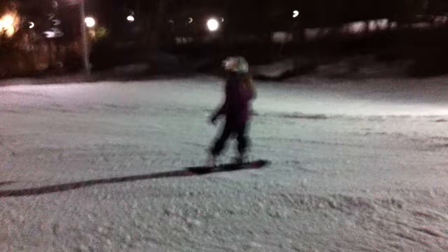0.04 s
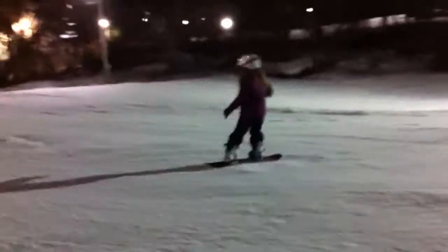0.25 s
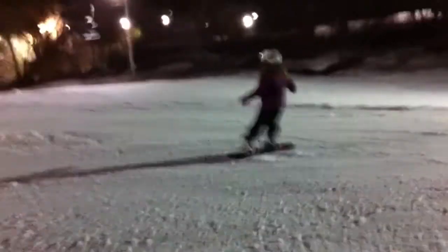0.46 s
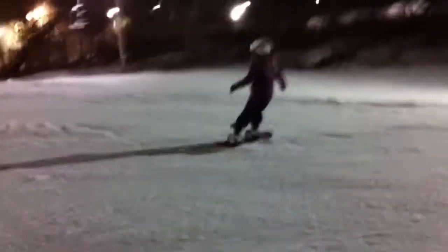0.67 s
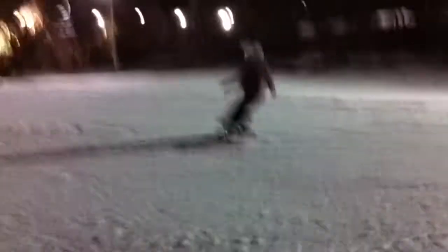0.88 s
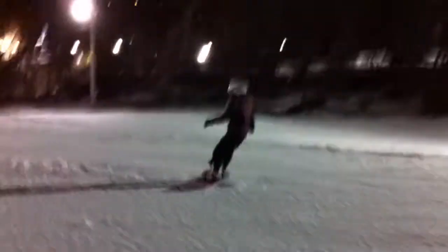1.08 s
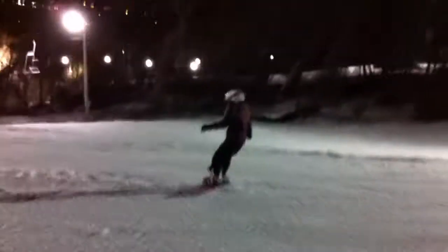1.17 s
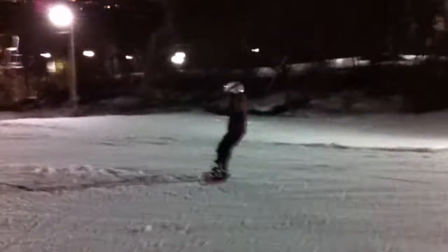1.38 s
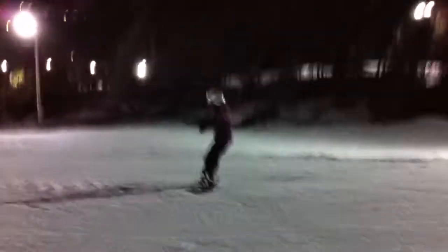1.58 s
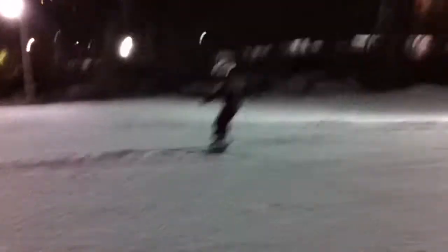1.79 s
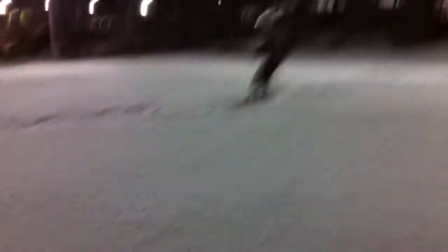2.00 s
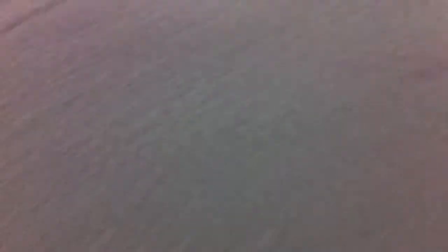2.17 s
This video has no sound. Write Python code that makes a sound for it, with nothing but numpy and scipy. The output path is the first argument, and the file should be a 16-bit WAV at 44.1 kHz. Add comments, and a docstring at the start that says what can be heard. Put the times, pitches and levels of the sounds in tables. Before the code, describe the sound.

Snowboard edge rasping across icy snow with low deck thumps, fading, then a finer braking hiss

```python
"""A snowboard slides over hard groomed snow near a small camera; the sound starts abruptly.
Ice crumbs excite the low modes of the deck and the broad resonances of the scraping steel edge,
lumps of snow rasp on the edge, and fine grains of thrown snow hiss. A low puff comes early.
Midway the board swings from carving to skidding, and the edge changes colour.
At last it brakes, and the hiss of the snow grows stronger and finer."""
import sys
import numpy as np
from scipy import signal
from scipy.fft import rfft, irfft, next_fast_len
from scipy.io import wavfile
from scipy.ndimage import uniform_filter1d, map_coordinates

SR = 44100
rng = np.random.default_rng(int(sys.argv[2]) if len(sys.argv) > 2 else 0)


def linear_from_db(decibels):
    """Turn decibels (scalar or array-like) into linear amplitude factors; 0 gives 1."""
    return 10 ** (np.asarray(decibels, float) / 20)


def generate_wav(sig):
    """Save sig (samples, or channels by samples) to the path in sys.argv[1] as 16-bit PCM at SR."""
    pcm = np.round(np.clip(np.atleast_2d(sig).T, -1, 1) * 32767).astype(np.int16)
    wavfile.write(sys.argv[1], SR, pcm)


N = 98739  # samples

# Resonances of the steel edge while carving: centre f/Hz, bandwidth/Hz, relative level/dB
CARVE_RINGS = [(915, 326, 1.5), (1190, 405, -0.5), (1940, 240, -5.5), (2940, 190, -10.5)]


def unit(x):
    """Normalisation: scale a signal to an rms of 1."""
    return x / np.sqrt(np.mean(x ** 2) + 1e-20)


def level_curve(rows):
    """Linear interpolation of (t/s, level/dB) rows to dB at each sample."""
    return np.interp(np.arange(N) / SR, *np.transpose(rows))


def wobble(rate):
    """Band-limited fluctuation: a smooth curve through random knots, rate of them a second."""
    knots = rng.standard_normal(int(N * rate / SR) + 4)
    return map_coordinates(knots, [np.arange(N) * rate / SR])


def filtered(x, response):
    """Linear filtering: the spectrum of x times a complex response of frequency."""
    m = next_fast_len(N + SR // 2)  # zero padding leaves room for the ringing
    return irfft(rfft(x, m) * response(np.fft.rfftfreq(m, 1 / SR)), m)[..., :N]


def rings(table):
    """Modal superposition: causal second-order resonances summed with alternating sign."""
    def response(f):
        total = 0
        for k, (centre, width, db) in enumerate(table):
            mode = 1j * f * width / (centre * centre - f * f + 1j * f * width)
            total = total + (-1) ** k * linear_from_db(db) * mode
        return total
    return response


def crumbs(per_s, spread_db, smooth_db):
    """Granular excitation: random clicks of scattered size over smooth friction noise."""
    size = np.minimum(rng.exponential(size=N), 3)
    sign = np.sign(rng.standard_normal(N))
    clicks = (rng.random(N) < per_s / SR) * linear_from_db(spread_db * size) * sign
    return unit(clicks) + linear_from_db(smooth_db) * rng.standard_normal(N)


def patchy(x, depth_db):
    """Time-frequency modulation: smooth patches of random gain over the short-time spectrum."""
    spectrum = signal.stft(x, nperseg=512)[2]
    field = uniform_filter1d(rng.standard_normal(spectrum.shape), 8, 0)  # over frequency bins
    field = uniform_filter1d(field, 10, 1)  # over frames
    return unit(signal.istft(spectrum * linear_from_db(depth_db * unit(field)), nperseg=512)[1][:N])


def wind():
    """Wind noise: gusty low-frequency pressure on the microphone, with one Gaussian puff."""
    wind_db, gust_db, gusts_per_s = -66.5, 2.2, 9.4
    puff_s, puff_db, puff_length_s = .225, -33, 0.0023  # the length is two standard deviations
    rumble = filtered(rng.standard_normal(N), lambda f: (f / 120) ** 1.6 / (1 + (f / 130) ** 8))
    puff = np.exp(-.5 * ((np.arange(N) / SR - puff_s) / puff_length_s * 2) ** 2)
    return linear_from_db(wind_db + gust_db * wobble(gusts_per_s)) * unit(rumble) + linear_from_db(puff_db) * puff


def spray():
    """Granular noise: dense impacts of thrown snow merge into a hiss, finer as the board brakes."""
    # Hiss of the thrown snow: t/s, relative level/dB
    hiss_level = [(0.12, -24.5), (0.49, -25.5), (0.56, -28.5), (0.65, -22.5), (0.71, -30), (0.74, -26.5),
                  (0.88, -27.5), (0.97, -31.5), (1.1, -28.5), (1.25, -31.5), (1.84, -27), (1.89, -31),
                  (1.96, -22.5), (2.18, -28.5), (2.2, -36.5), (2.23, -30)]
    # Spectrum of the hiss: f/Hz, relative level/dB per Hz
    snow_spectrum = [(290, -16), (500, -6), (1110, -7), (1260, -1), (1640, -5.5), (2130, -3), (2810, -5.5),
                     (9630, -11), (16000, -18.5)]
    # Topmost treble of the hiss: t/s, gain/dB
    treble_gain = [(.12, -4), (.5, -6.5), (.95, -4), (1.3, -2.5), (1.48, -0.5), (1.6, -0.5), (2, 4),
                   (2.24, 1)]
    spray_db = 5
    hz, db = np.transpose(snow_spectrum)
    flutter_db = 1.13 * wobble(25.82) + 0.61 * wobble(150)
    grains = linear_from_db(flutter_db) * crumbs(9000, spread_db=1.0, smooth_db=3.5)
    hiss = filtered(grains, lambda f: linear_from_db(np.interp(np.log(f + 1), np.log(hz), db)))
    hiss = patchy(hiss, depth_db=0.86)
    treble = filtered(hiss, lambda f: 1 / (1 + (9000 / (f + 1)) ** 4))
    coloured = hiss - treble + treble * linear_from_db(level_curve(treble_gain))
    return linear_from_db(level_curve(hiss_level) + spray_db) * coloured


def thuds():
    """Modal response: the main deck mode hums in short swells that rise faster than they die."""
    # Swells of the deck: start t/s, peak level/dB, f/Hz, length/s
    swells = [(0.114, -12, 287, 0.033), (0.229, -17.5, 296, 0.036), (0.629, -9, 297, .03),
              (0.647, -12, 278, 0.038), (0.755, -16, 230, 0.029), (1.142, -15.5, 290, 0.039),
              (1.186, -23, 278, 0.048), (1.967, -21, 255, 0.033), (2.02, -19.5, 293, 0.044),
              (2.127, -20, 314, 0.032), (2.172, -18, 322, 0.023)]
    t, total = np.arange(N) / SR, np.zeros(N)
    for start, db, hz, length in swells:
        swell = np.sin(np.pi * np.clip((t - start) / length, 0, 1) ** 0.74) ** 2
        phase = 2 * np.pi * rng.random()
        total += linear_from_db(db) * swell * np.sin(2 * np.pi * hz * (t - start) + phase)
    return total


def lumps():
    """Impact excitation: lumps hit give exponentially decaying noise that rings the edge."""
    # Lumps hit: t/s, relative peak level/dB
    bumps = [(0.118, -5), (0.179, -6), (0.235, 0), (0.411, -16), (0.603, -21), (0.668, 1), (0.76, 0.5),
             (1.06, -17), (1.153, -15), (1.417, -22)]
    bump_db, t60_s = 6.5, 0.033
    t, envelope = np.arange(N) / SR, np.zeros(N)
    for hit, db in bumps:
        envelope += (t >= hit) * linear_from_db(db + bump_db - 60 * np.maximum(t - hit, 0) / t60_s)
    return filtered(envelope * rng.standard_normal(N), rings(CARVE_RINGS))


def deck(shake_db):
    """Forced vibration: ice crumbs knock the deck, whose low modes answer as drumming."""
    # Drumming of the deck: t/s, relative level/dB
    drum_level = [(0.12, -11.5), (0.16, -26), (0.19, -15.5), (0.22, -25.5), (0.24, -18), (0.27, -20),
                  (0.51, -17), (0.56, -27.5), (0.65, -14), (0.72, -27), (0.76, -15.5), (0.89, -21.5),
                  (0.99, -32), (1.04, -24), (1.14, -18), (1.16, -25), (1.18, -43), (1.21, -22.5),
                  (1.26, -34), (1.28, -25), (1.35, -34), (1.42, -24.5), (1.5, -25), (1.54, -37),
                  (1.57, -26.5), (1.72, -31.5), (1.84, -20.5), (1.88, -29.5), (1.94, -19.5), (2.04, -22),
                  (2.08, -20.5), (2.19, -23.5), (2.21, -26), (2.23, -21)]
    # Modes of the deck: centre f/Hz, bandwidth/Hz, relative level/dB
    deck_modes = [(176, 147, -12), (295.5, 76, 0), (380, 158, -1), (538, 345, -8)]
    deck_db = -4
    knocks = linear_from_db(0.4 * shake_db) * crumbs(900, spread_db=5.0, smooth_db=-2.5)
    return linear_from_db(level_curve(drum_level) + deck_db) * unit(filtered(knocks, rings(deck_modes)))


def edge(shake_db):
    """Friction-driven resonance: the scraping edge shifts its modes as carving turns to skidding."""
    # Scrape of the edge: t/s, relative level/dB
    scrape_level = [(0.12, -16), (0.17, -19.5), (0.19, -16), (0.21, -18), (0.25, -15.5), (0.27, -20),
                    (0.32, -15), (0.35, -16), (0.37, -22.5), (0.48, -12.5), (0.57, -32), (0.61, -13.5),
                    (0.67, -14), (0.67, -11.5), (0.7, -23), (0.77, -14), (0.82, -20), (0.83, -16),
                    (0.84, -30), (0.85, -13.5), (0.98, -32.5), (1.04, -22), (1.15, -18), (1.28, -31.5),
                    (1.47, -23), (1.75, -30.5), (1.81, -21), (1.91, -26.5), (1.94, -17), (1.98, -24),
                    (2.03, -20.5), (2.18, -21), (2.2, -33), (2.23, -24.5)]
    # Resonances of the edge set across the slope: centre f/Hz, bandwidth/Hz, relative level/dB
    skid_modes = [(725, 480, -2.5), (1210, 720, 0.5), (2030, 430, -1), (2970, 1000, -10)]
    edge_db, turn_s, turn_length_s = -1.5, 1.4, 0.53  # turn_s is the middle of the turn
    friction = linear_from_db(shake_db) * crumbs(2500, spread_db=1.5, smooth_db=-1.5)
    skid = np.clip((np.arange(N) / SR - turn_s) / turn_length_s + .5, 0, 1)
    carving = unit(filtered(friction, rings(CARVE_RINGS)))
    skidding = unit(filtered(friction, rings(skid_modes)))
    scrape = patchy((1 - skid) * carving + skid * skidding, depth_db=2.5)
    return linear_from_db(level_curve(scrape_level) + edge_db) * scrape


def board():
    """Common excitation: the uneven snow shakes deck and edge together; lumps and thuds add."""
    shake_db = 1.45 * wobble(35.72) + 0.37 * wobble(120)
    return deck(shake_db) + edge(shake_db) + lumps() + thuds()


def scene():
    """Superposition of thrown snow and board in one channel."""
    return (spray() + board())[None]


def top_cut(x):
    """Nothing passes above the cut-off."""
    return signal.sosfilt(signal.butter(12, 16510, fs=SR, output="sos"), x)


def record(dry):
    """Saturation and band limiting: the camera rounds peaks, cuts bass and top, and starts late."""
    clip_top, clip_hardness = 0.55, 3.5  # ceiling amplitude, sharpness of the knee
    low_cut_hz, top_hz = 156.5, 15850
    start_s, fade_s = .1195, 0.0022
    rounded = dry / (1 + np.abs(dry / clip_top) ** clip_hardness) ** (1 / clip_hardness)
    bass_cut = signal.butter(5, low_cut_hz, "high", fs=SR, output="sos")
    mix = signal.sosfilt(bass_cut, rounded) + wind()  # the wind level is that left under the bass cut
    mix = filtered(mix, lambda f: f < top_hz)
    mix = mix * np.clip((np.arange(N) / SR - start_s) / fade_s, 0, 1)
    return top_cut(mix)


dry = scene()
out = record(dry)
generate_wav(out)
```